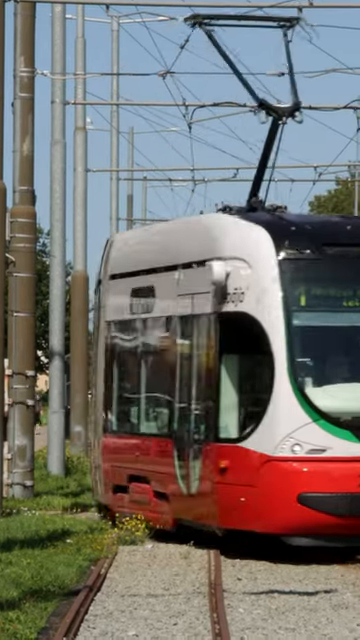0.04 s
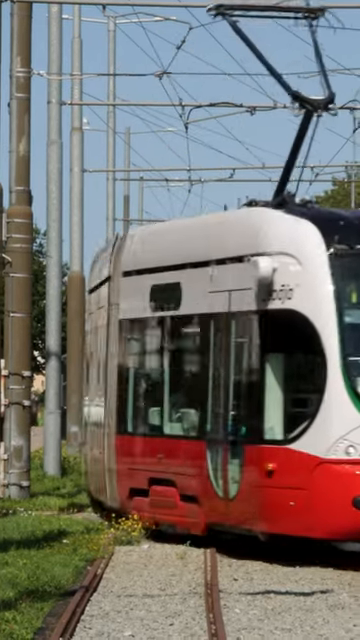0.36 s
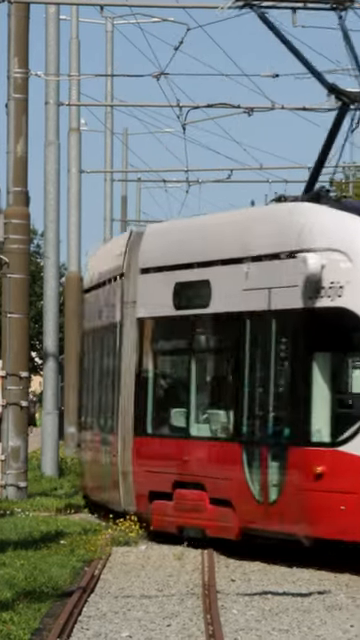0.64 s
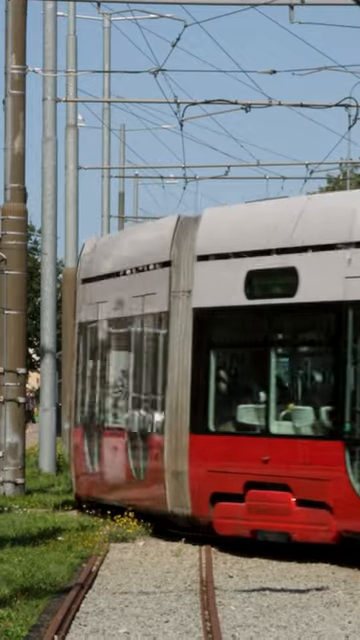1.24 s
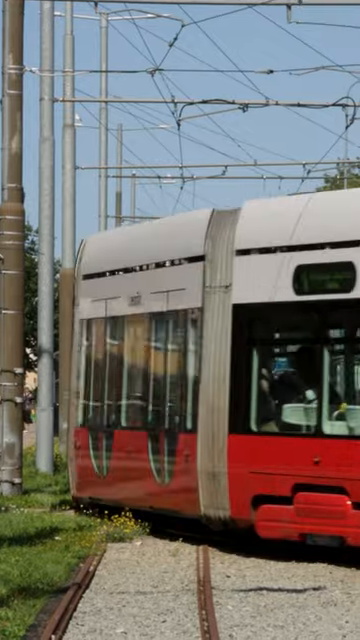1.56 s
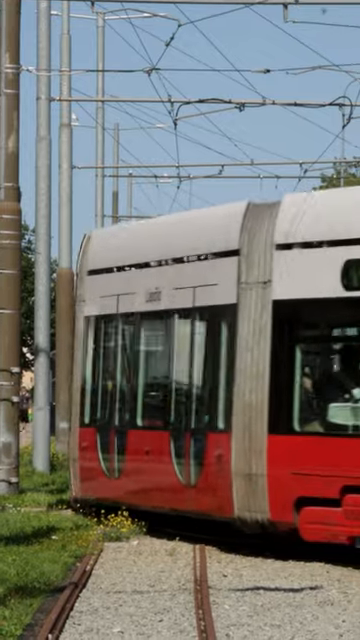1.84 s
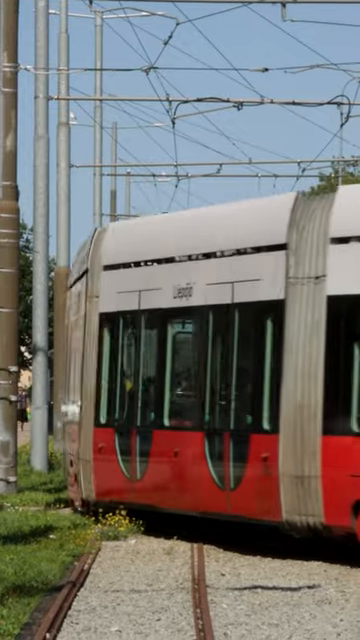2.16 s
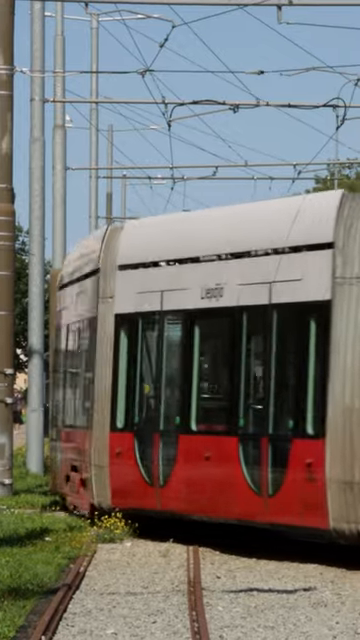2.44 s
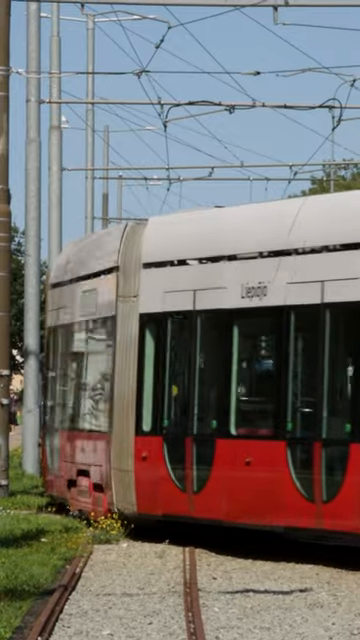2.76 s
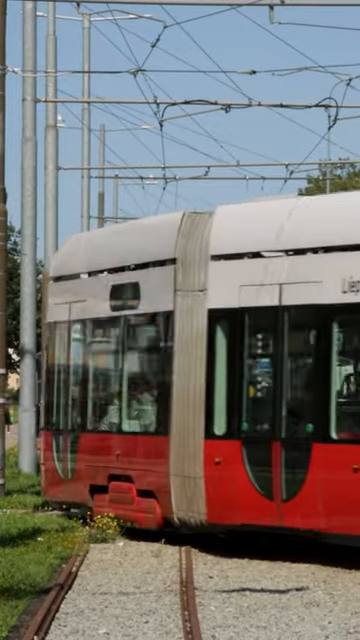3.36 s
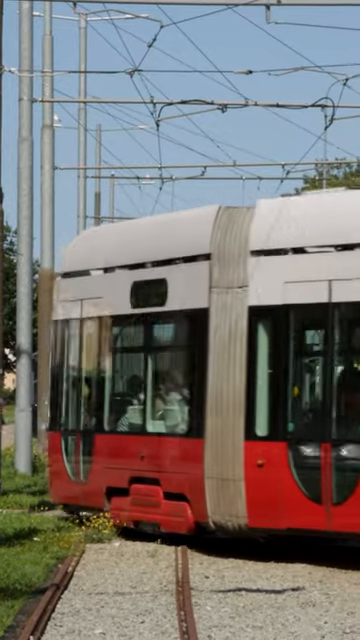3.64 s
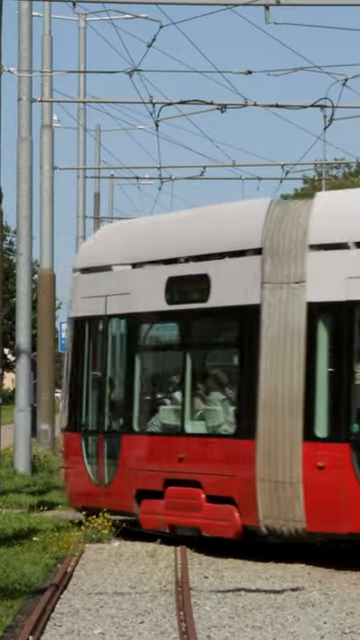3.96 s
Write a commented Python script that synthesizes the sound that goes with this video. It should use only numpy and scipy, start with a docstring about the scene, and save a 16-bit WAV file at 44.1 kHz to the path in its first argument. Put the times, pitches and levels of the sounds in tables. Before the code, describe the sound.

High, wavering wheel squeal from a slowly turning tram, with metal scraping and low rumble.

```python
"""Wheel squeal of a tram creeping round a tight curve in the open, a few metres away.
The wheels slip sideways and sing in three modes; several at nearly one pitch beat against each other.
Flanges scrape the rail, ring the wheels and chirp in further modes. Underneath: rolling, rumble,
knocks, a rail joint and faint hum. The rolling grows, with two thumps, as a bogie comes close."""
import sys
import numpy as np
from scipy import signal
from scipy.fft import rfft, irfft
from scipy.io import wavfile
from scipy.ndimage import map_coordinates

SR = 44100
rng = np.random.default_rng(int(sys.argv[2]) if len(sys.argv) > 2 else 0)


def log_audio(samples):
    """Write samples as a 16-bit WAV file to the path given in sys.argv[1]."""
    # one column per channel
    frames = np.atleast_2d(samples).T
    # limit to full scale, then quantise
    limited = np.clip(frames, -1, 1)
    pcm = np.round(limited * 32767).astype(np.int16)
    wavfile.write(sys.argv[1], SR, pcm)


N = 176400
T = np.arange(N) / SR

# electrical hum: f/Hz, level/dB
HUM_TONES = [(452, -74), (744, -76)]
# rumble spectrum: f/Hz, relative density/dB
RUMBLE_SPECTRUM = [(15, -43), (30, -3.5), (55, -5), (85, -0.5), (120, -8.5), (220, -11), (330, -11),
                   (600, -12), (1500, -31)]
# rumble envelope: t/s, level/dB
RUMBLE_DB = [(0, -63), (.7, -64.5), (1.55, -61.5), (2.4, -62), (2.9, -62), (3.6, -63), (4, -54)]
# rolling spectrum: f/Hz, relative density/dB
ROLL_SPECTRUM = [(95, -9), (150, 0), (270, -2.5), (350, -4), (480, -11.5), (700, -13.5), (950, -5.5),
                 (1400, -8), (1800, -7), (2150, -10.5), (2650, -9.5), (3400, -14)]
# rolling envelope: t/s, level/dB
ROLL_DB = [(0, -59), (.65, -60.5), (1.05, -58), (1.85, -58.5), (2.2, -58.5), (2.78, -57), (2.86, -50.5),
           (3.1, -52), (3.5, -52), (3.85, -52), (3.95, -58.5), (4, -60)]
# bogie bumps: t/s, length/s, level/dB
BUMP_EVENTS = [(0.156, 0.035, -57.5), (0.695, 0.15, -60), (1.05, 0.41, -61), (2.882, 0.022, -46.5),
               (3.362, 0.025, -51), (3.438, 0.037, -47.5)]
# bump spectrum: f/Hz, relative density/dB
BUMP_SPECTRUM = [(40, -22), (80, 10.5), (130, -10), (220, -8), (340, -13), (500, -20.5)]
# running-gear knocks: t/s, base f/Hz, t60/s, level/dB
KNOCK_EVENTS = [(0.162, 85, 0.065, -53), (0.562, 374, 0.051, -41.5), (.678, 265, .05, -50),
                (1.391, 169, 0.054, -52.5), (2.885, 162, 0.082, -42.5), (3.439, 92, 0.083, -50),
                (3.444, 333, 0.068, -45)]
# knock modes: ratio to base f, gain/dB
KNOCK_PARTIALS = [(0.92, 5), (0.625, -3), (2.1, -13)]
# rail joint crossing: t/s, length/s, level/dB
JOINT_EVENT = (2.872, 0.042, -42)
# modes rung at the joint: f/Hz, width/Hz, gain/dB
JOINT_RESONANCES = [(885, 40, 7), (1900, 660, -17), (2640, 260, -1), (2800, 110, 3)]

# flange friction envelope: t/s, level/dB
FRICTION_DB = [(0, -56.5), (.08, -58), (.5, -57.5), (.6, -63), (.71, -55.5), (.76, -59), (.81, -52.5),
               (1.3, -54.5), (1.7, -52.5), (2.0, -55), (2.22, -52.5), (2.5, -53.5), (2.62, -54), (2.8, -54),
               (2.98, -48), (3.16, -52), (3.38, -50.5), (3.52, -48), (3.63, -47), (3.87, -47),
               (3.93, -58.5), (4, -56)]
# wheel modes rung by friction: f/Hz, width/Hz, gain/dB
FRICTION_RESONANCES = [(1739, 49, -2), (2890, 30, 9), (3008, 280, 4.5), (4010, 940, -7.5), (4496, 70, 3),
                       (5130, 140, -4), (5815, 150, 3.5), (6400, 110, -13.5), (7405, 92, -1.5),
                       (8780, 78, -3), (10350, 190, -13), (11840, 250, -7), (13300, 190, -15),
                       (14400, 460, -12)]
# contact hiss: f/Hz, relative density/dB
FRICTION_SPECTRUM = [(1000, -19.5), (2400, -10), (3500, -1), (5000, -4), (6500, -6), (9500, -10),
                     (12500, -12.5), (14500, -14.5), (16000, -13)]
# flange scrapes: t/s, length/s, level/dB
SCRAPE_EVENTS = [(0.18, .04, -59), (0.623, 0.098, -59), (0.912, 0.051, -46.5), (1.742, 0.16, -51),
                 (1.88, 0.074, -55), (2.086, 0.11, -49), (2.24, 0.26, -50.5), (2.353, 0.07, -47),
                 (2.69, 0.086, -48.5), (3.036, 0.068, -47.5), (3.271, 0.077, -42.5), (3.44, 0.14, -47.5),
                 (3.676, 0.26, -49.5)]
# modes of the scraping wheel: f/Hz, width/Hz, gain/dB
SCRAPE_RESONANCES = [(5920, 160, -0.5), (7210, 120, -2), (7850, 600, -12), (8700, 130, 4.5),
                     (10280, 190, -10), (11300, 550, -18), (13000, 310, -15)]
# scrape hiss: f/Hz, relative density/dB
SCRAPE_SPECTRUM = [(4500, 5.5), (6500, -4), (9500, -5), (12500, -8), (15500, -8)]
# single modes catching: t/s, length/s, f/Hz, rms shake/Hz, level/dB
CHIRP_EVENTS = [(0, 0.67, 1710, 25, -69), (0.805, 1.2, 5180, 72, -63), (0.93, 0.025, 8960, 78, -44.5),
                (1.487, 0.12, 1850, 70, -62), (1.73, .11, 1765, 45, -62), (2.243, 0.36, 1740, 48.6, -63),
                (2.389, 0.052, 8710, 60, -45), (2.839, 0.029, 2893, 22, -41),
                (2.839, 0.05, 1730, 25, -54.5), (2.95, 0.058, 5110, 71, -46.5),
                (2.992, .045, 1790, 21.7, -50), (2.999, 0.071, 3076, 21.9, -38.5),
                (3.036, 0.013, 2990, 29, -32), (3.063, 0.031, 5100, 34, -41), (3.075, 0.055, 3070, 28, -46),
                (3.097, 0.0096, 2960, 19, -32.5), (3.109, .009, 2990, 20, -32.5),
                (3.153, 0.066, 3040, 41, -43.5), (3.301, 0.047, 3090, 44, -42.5),
                (3.318, 0.17, 5840, 55, -46.5), (3.586, 0.11, 8880, 13, -52.5),
                (3.696, 0.03, 5090, 50, -44)]

# low squeal pitch: t/s, f/Hz
LOW_HZ = [(0, 2925), (.35, 2921), (.85, 2914), (1.25, 2935), (1.55, 2905), (1.9, 2919), (2.6, 2918.5),
          (2.87, 2897.5), (3.1, 2919), (3.5, 2904), (4, 2898.5)]
# low squeal envelope: t/s, level/dB
LOW_DB = [(0, -46.5), (.5, -45), (.65, -40), (.8, -45), (1.0, -42.5), (1.12, -45), (1.45, -42.5),
          (1.62, -53.5), (1.73, -58), (1.84, -46), (2.03, -42.5), (2.15, -47.5), (2.3, -42.5), (2.65, -50),
          (2.8, -57), (2.96, -54.5), (3.01, -38.5), (3.18, -37.5), (3.39, -47.5), (3.5, -40.5),
          (3.65, -50.5), (3.73, -42.5), (4, -73.5)]
# wheels in the low squeal: offset/Hz, gain/dB
LOW_VOICES = [(0, -3.5), (-14, -6.5), (16.5, -6.5)]
# high squeal pitch: t/s, f/Hz
HIGH_HZ = [(0, 4394), (.3, 4376), (.52, 4394), (.63, 4351.5), (.75, 4412), (1.15, 4456), (1.9, 4452.5),
           (2.4, 4434), (2.77, 4444.5), (2.98, 4349), (3.25, 4421.5), (3.8, 4412), (4, 4380)]
# high squeal envelope: t/s, level/dB
HIGH_DB = [(0, -46), (.17, -52), (.53, -46.5), (.67, -62.5), (.73, -41), (.78, -63), (.85, -48.5),
           (1.28, -41.5), (1.4, -47.5), (1.58, -35.5), (1.93, -36), (1.99, -47), (2.23, -41), (2.55, -43),
           (2.74, -35.5), (2.81, -46), (3.02, -46.5), (3.09, -64), (3.14, -44), (3.28, -42.5), (3.32, -68),
           (3.38, -48.5), (3.6, -38.5), (3.69, -49.5), (3.75, -33.5), (3.825, -33), (3.85, -43), (4, -55.5)]
# its third harmonic: t/s, level/dB
HIGH_THIRD_DB = [(0, -78), (.75, -73), (1.0, -62), (1.5, -61), (2.0, -66), (2.5, -67), (4, -88)]
# wheels in the high squeal: offset/Hz, gain/dB
HIGH_VOICES = [(1, -5.5), (-30, -7), (24, -10.5), (-66, -16.5)]
# top squeal pitch, about an octave above the high: t/s, f/Hz
TOP_HZ = [(0, 8909.5), (.9, 8911), (1.9, 8904.5), (4, 8889)]
# top squeal envelope: t/s, level/dB
TOP_DB = [(0, -85), (.6, -76), (.68, -76), (.9, -51.5), (1.05, -65), (1.3, -54), (1.7, -56), (1.86, -45.5),
          (2.0, -54), (2.45, -62), (2.6, -62.5), (3.2, -57), (3.65, -56), (4, -56.5)]
# wheels in the top squeal: offset/Hz, gain/dB
TOP_VOICES = [(-0.5, 2.5), (-105, -3), (69, -5.5)]


def undb(db):
    """dB to gain."""
    return 10 ** (np.asarray(db) / 20)


def unit_rms(x):
    """Scale to rms 1."""
    return x / np.sqrt(np.mean(x ** 2))


def curve(rows):
    """Linear interpolation of (t/s, value) rows."""
    return np.interp(T, *np.array(rows, float).T)


def walk(rate_hz):
    """Smooth random motion, rms 1, rate_hz knots a second."""
    return unit_rms(map_coordinates(rng.standard_normal(4096), [T * rate_hz + 4], order=2, mode="wrap"))


def colour(x, spectrum):
    """Filter by a spectrum, -20 dB/octave past its ends; rms 1."""
    hz, db = np.array(spectrum, float).T
    octave = np.log2(np.maximum(np.fft.rfftfreq(N, 1 / SR), 1))
    beyond_oct = np.abs(octave - np.clip(octave, np.log2(hz[0]), np.log2(hz[-1])))
    gain_db = np.interp(octave, np.log2(hz), db) - 20 * beyond_oct
    return unit_rms(irfft(rfft(x) * undb(gain_db), N))


def ring(force, modes):
    """Force through wheel resonances; rms 1."""
    bins_hz = np.fft.rfftfreq(N, 1 / SR)
    response = sum(undb(db) / (1 + 2j * (bins_hz - hz) / width_hz) ** 2 for hz, width_hz, db in modes)
    return unit_rms(irfft(rfft(force) * response, N))


def gate(start_s, length_s, edge_s):
    """Trapezoid envelope."""
    return np.clip(np.minimum(T - start_s, start_s + length_s - T) / edge_s, 0, 1)


def phase_rad(hz):
    """Running phase, random start."""
    return 2 * np.pi * (np.cumsum(hz) / SR + rng.random())


def slips(grain_db):
    """Stick-slip force: dense impulses of uneven size."""
    return unit_rms(rng.standard_normal(N) * undb(grain_db * walk(700)))


def hum():
    """Electrical equipment: faint, slightly wavering tones."""
    return sum(np.sqrt(2) * undb(db) * np.sin(phase_rad(hz + 3 * walk(10))) for hz, db in HUM_TONES)


def rumble():
    """Low noise, slowly wavering in level."""
    return colour(rng.standard_normal(N), RUMBLE_SPECTRUM) * undb(curve(RUMBLE_DB) + 0.73 * walk(8.3))


def rolling():
    """Wheels grind along the rail."""
    return colour(slips(grain_db=1.0), ROLL_SPECTRUM) * undb(curve(ROLL_DB) + walk(25.02))


def bumps(edge_s=0.0037):
    """Uneven rail shakes the bogie in low bursts."""
    bursts = sum(undb(db) * gate(start_s, length_s, edge_s) for start_s, length_s, db in BUMP_EVENTS)
    return colour(slips(grain_db=1.5), BUMP_SPECTRUM) * bursts


def knocks(attack_s=0.0023):
    """Dull blows ring damped modes of the running gear."""
    out = np.zeros(N)
    for start_s, hz, t60_s, db in KNOCK_EVENTS:
        age_s = np.maximum(T - start_s, 0)
        body = sum(undb(gain_db) * np.sin(2 * np.pi * hz * ratio * age_s)
                   for ratio, gain_db in KNOCK_PARTIALS)
        envelope = (1 - np.exp(-age_s / attack_s)) * undb(-60 * age_s / t60_s)
        out += undb(db) * body * envelope
    return out


def rail_joint():
    """A wheel crosses a joint: brief clatter in heavily damped modes."""
    start_s, length_s, db = JOINT_EVENT
    swell = gate(start_s, length_s, edge_s=length_s / 2)
    return undb(db) * swell * ring(slips(grain_db=2), JOINT_RESONANCES)


def flanges(edge_s=0.031):
    """Flange friction rings one wheel, scrapes ring another; both hiss and flicker."""
    rub = undb(0.5) * ring(slips(grain_db=5.0), FRICTION_RESONANCES)
    rub += undb(-2) * colour(slips(grain_db=1.5), FRICTION_SPECTRUM)
    scrape = ring(slips(grain_db=6.5), SCRAPE_RESONANCES)
    scrape += undb(-6) * colour(rng.standard_normal(N), SCRAPE_SPECTRUM)
    presses = sum(undb(db) * gate(start_s, length_s, edge_s) for start_s, length_s, db in SCRAPE_EVENTS)
    flicker = undb(walk(29.92))
    return (rub * undb(curve(FRICTION_DB)) + unit_rms(scrape) * presses) * flicker


def chirps():
    """One mode catches with shaky pitch and chattering grip, then lets go."""
    out = np.zeros(N)
    shake = walk(330)
    chatter = unit_rms(undb(2 * walk(170)))
    for start_s, length_s, hz, shake_hz, db in CHIRP_EVENTS:
        shift = rng.integers(N)  # decorrelates the chirps
        tone = np.sqrt(2) * np.sin(phase_rad(hz + shake_hz * np.roll(shake, shift)))
        envelope = gate(start_s, length_s, edge_s=0.18 * length_s)
        out += undb(db) * envelope * np.roll(chatter, shift) * tone
    return out


def sing(pitch_hz, level_db, wheels, wander_hz, tremble_hz, flutter_db, flutter_hz):
    """Self-excited wheels beat in one mode. Returns harmonics 1-3, each rms 1."""
    harmonics = np.zeros((3, N))
    # above -38 dB the first wheel takes over and the pitch steadies
    lead_db = 1.83 * np.maximum(curve(level_db) + 38, 0)
    looseness = undb(-1.5 * lead_db)
    for k, (offset_hz, db) in enumerate(wheels):
        shake_hz = looseness * (wander_hz * walk(25) + tremble_hz * walk(300))
        phase = phase_rad(curve(pitch_hz) + offset_hz + shake_hz)
        grip = 2 * np.tanh(walk(flutter_hz) + 1)  # mostly firm, brief losses
        gain_db = db + flutter_db * grip - (k > 0) * lead_db
        harmonics += undb(gain_db) * np.sin(np.outer([1, 2, 3], phase))
    return [unit_rms(harmonic) for harmonic in harmonics]


def squeal():
    """Sideways slip drives three wheel modes; the lower two carry overtones."""
    low = sing(LOW_HZ, LOW_DB, LOW_VOICES, wander_hz=5.095, tremble_hz=5.2, flutter_db=4, flutter_hz=50)
    high = sing(HIGH_HZ, HIGH_DB, HIGH_VOICES,
                wander_hz=8.87, tremble_hz=18.6, flutter_db=4.5, flutter_hz=80)
    top = sing(TOP_HZ, TOP_DB, TOP_VOICES, wander_hz=14, tremble_hz=37.7, flutter_db=5.5, flutter_hz=80)
    return (undb(curve(LOW_DB)) * (low[0] + undb(-25) * low[1])
            + undb(curve(HIGH_DB)) * (high[0] + undb(-24) * high[1])
            + undb(curve(HIGH_THIRD_DB)) * high[2]
            + undb(curve(TOP_DB)) * top[0])


def scene():
    """Tram plus faint scatter from ground, car body and yard; mono."""
    echo_t60_s, echo_db = 0.41, -14
    tram = squeal() + flanges() + chirps() + rolling() + rumble() + hum()
    tram += bumps() + knocks() + rail_joint()
    tail = rng.standard_normal(N) * undb(-60 * T / echo_t60_s)
    echo = signal.fftconvolve(tram, tail / np.linalg.norm(tail))[:N]
    return (tram + undb(echo_db) * echo)[None]


def record(dry):
    """Steep elliptic low-pass."""
    cutoff_hz = 15720
    return signal.sosfilt(signal.ellip(12, .1, 80, cutoff_hz, fs=SR, output="sos"), dry)


dry = scene()
out = record(dry)
log_audio(out)
```